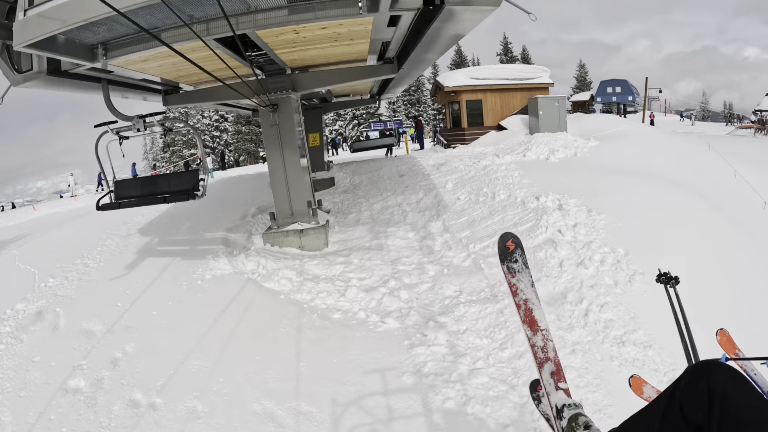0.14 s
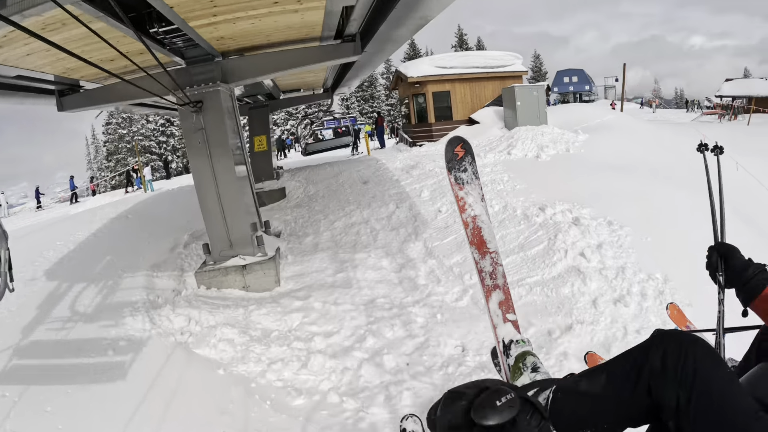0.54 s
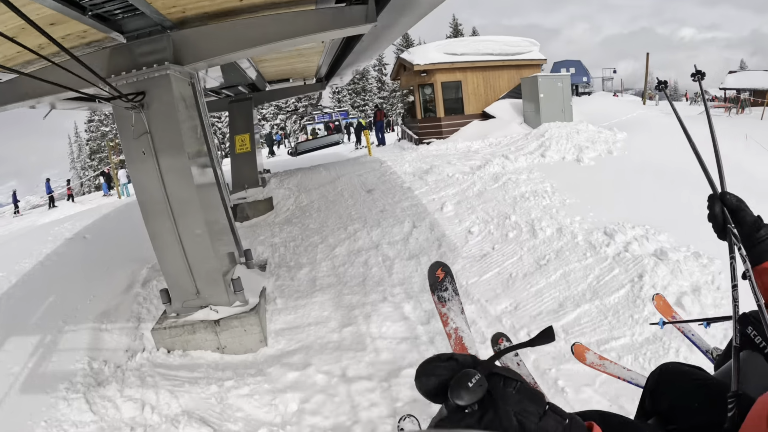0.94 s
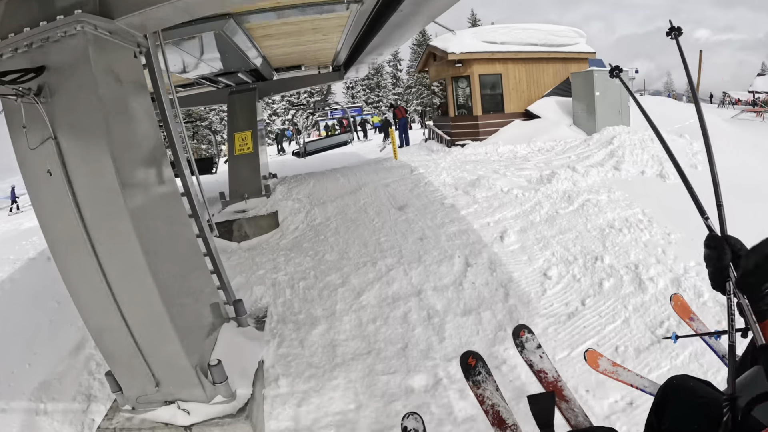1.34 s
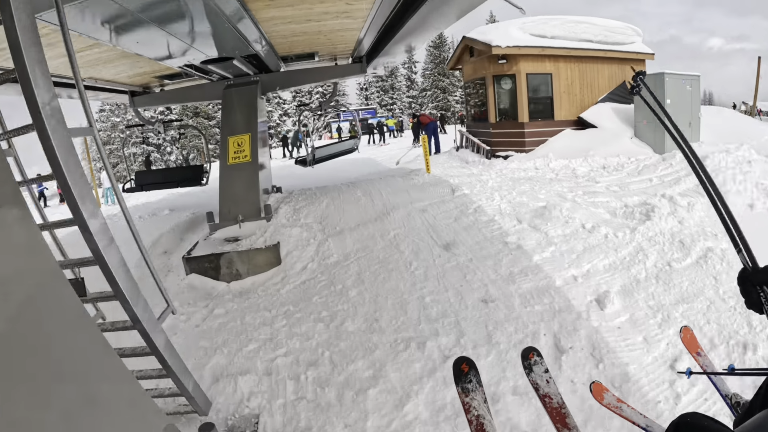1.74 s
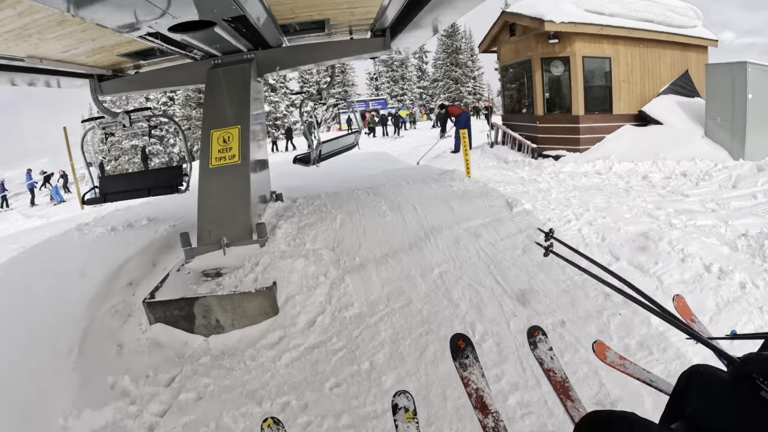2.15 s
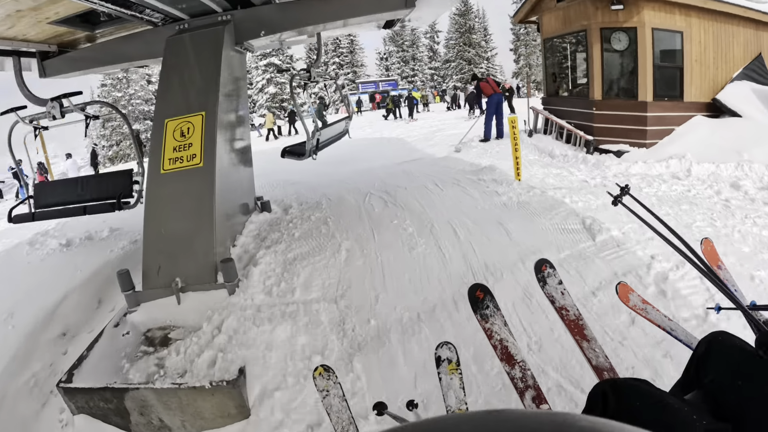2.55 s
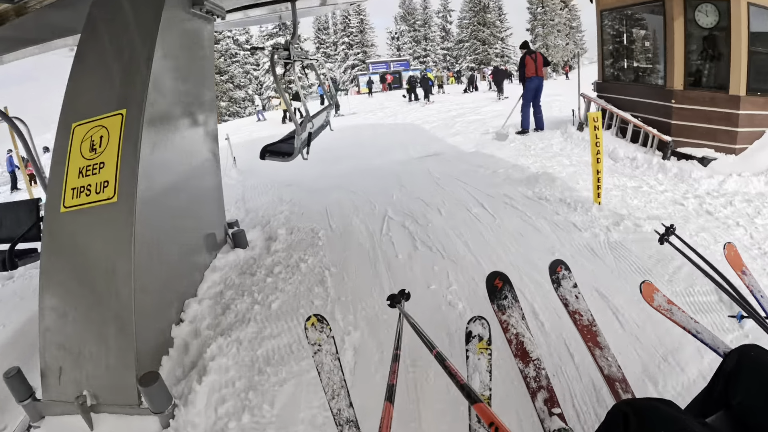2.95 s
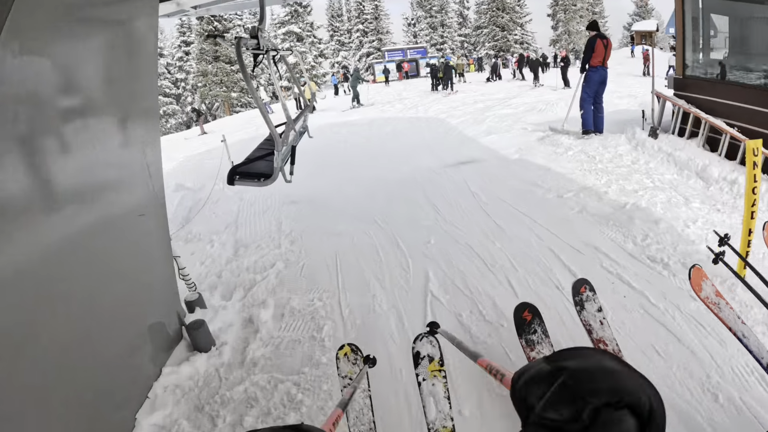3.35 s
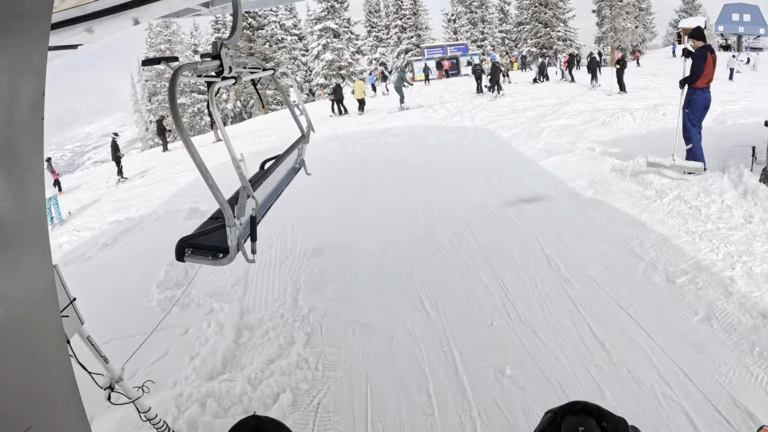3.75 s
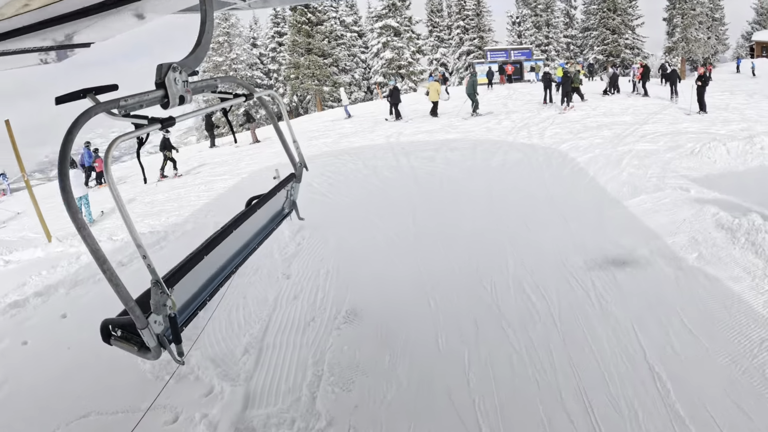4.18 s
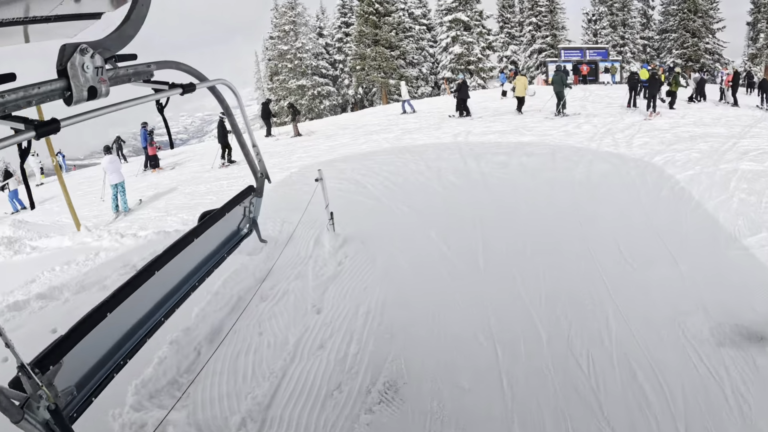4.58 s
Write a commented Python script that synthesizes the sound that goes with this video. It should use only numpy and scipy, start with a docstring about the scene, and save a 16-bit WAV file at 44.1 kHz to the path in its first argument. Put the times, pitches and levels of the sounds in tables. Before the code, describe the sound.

Heard from a chair passing beneath a lift terminal: after a cut and tiny silence, constant rolling roar like rail wheels, a wavering double gear hum and a deep drone. Small steel parts click and chatter with very short rings and a bright roof wash, heavier frame knocks among them. A faint whine flickers mid-ride; later the clanks thin out while the machinery runs to the end, single channel.

```python
"""Chairlift terminal ride

Two gear meshes hum a little over a semitone apart and beat, from wavering sines with a weak octave; the motor
drones low and a conveyor whine comes and goes in the same way. Rollers and tyres roar on the steel rail as
layered noise that also rings the steelwork; the grip and loose steel parts clank overhead as chatters of touches
through ringing modes, with a roof wash, heavier knocks and a thin hiss.
The sound breaks off after a moment in the open, then fades in under the terminal."""
import sys
import numpy as np
from scipy import signal
from scipy.io import wavfile

SR = 44100
rng = np.random.default_rng(int(sys.argv[2]) if len(sys.argv) > 2 else 0)


def persist_wave(psi):
    """Save psi, clipped to +-1, as 16-bit WAV."""
    counts = np.round(np.clip(psi, -1, 1) * 32767).astype(np.int16)
    wavfile.write(sys.argv[1], SR, np.atleast_2d(counts).T)


N = 208001

# the two gear meshes, swelling and sinking independently: (t/s, f/Hz, level/dB)
LOW_GEAR_MESH = [(0.3, 353.7, -28.5), (0.37, 359, -35), (0.44, 358, -27.5), (0.51, 357.6, -21.5),
                 (0.58, 361.2, -24), (0.65, 358, -37), (0.72, 358.5, -19), (0.79, 360.9, -18.5),
                 (0.86, 355.8, -28.5), (0.93, 355.8, -32.5), (1.0, 356.5, -35), (1.07, 357.7, -15.5),
                 (1.14, 358.1, -14.5), (1.21, 357.8, -26.5), (1.28, 357.5, -35), (1.35, 359.4, -45.3),
                 (1.42, 356.4, -20.5), (1.49, 357.1, -20), (1.56, 359.9, -26), (1.63, 360.7, -20.5),
                 (1.7, 357.6, -16.5), (1.77, 359.4, -22.5), (1.84, 359.3, -17.5), (1.91, 357.3, -17),
                 (1.98, 354.5, -26), (2.05, 358, -41), (2.12, 354.9, -36), (2.19, 362.7, -19),
                 (2.26, 353.5, -23), (2.33, 358.6, -43.5), (2.4, 359, -21), (2.47, 358, -17.5),
                 (2.54, 357.3, -28), (2.61, 359, -18), (2.68, 359.8, -31), (2.75, 368.7, -17),
                 (2.82, 360.5, -36), (2.89, 357.7, -17), (2.96, 361, -23.5), (3.03, 361, -20.5),
                 (3.1, 362.7, -17.5), (3.17, 355.3, -19), (3.24, 360.8, -16.5), (3.31, 355, -22.4),
                 (3.38, 355.7, -21), (3.45, 358.4, -12), (3.52, 356.5, -18.5), (3.59, 355.0, -27.5),
                 (3.66, 354.5, -20), (3.73, 359.7, -14.5), (3.8, 362.0, -16.5), (3.87, 360.9, -24),
                 (3.94, 366, -9.5), (4.01, 359.4, -20), (4.08, 356, -28.5), (4.15, 355.3, -19.5),
                 (4.22, 352.5, -18), (4.29, 358.2, -14.5), (4.36, 353, -24.5), (4.43, 356.8, -14),
                 (4.5, 356.3, -22), (4.57, 355.6, -14.5), (4.64, 358.6, -21)]
HIGH_GEAR_MESH = [(0.3, 386.6, -32), (0.37, 384.3, -30.1), (0.44, 384.7, -29), (0.51, 376, -37),
                  (0.58, 382, -27), (0.65, 382, -42), (0.72, 383.2, -26), (0.79, 383.4, -35.5),
                  (0.86, 382.5, -25), (0.93, 383.0, -16.5), (1.0, 384.1, -19), (1.07, 384.2, -30),
                  (1.14, 383.1, -30), (1.21, 377.6, -21), (1.28, 378, -27), (1.35, 380.6, -31),
                  (1.42, 389.3, -24), (1.49, 381.5, -25), (1.56, 383.6, -45.5), (1.63, 381.3, -24.5),
                  (1.7, 380, -16.5), (1.77, 378.2, -20.5), (1.84, 382.5, -25), (1.91, 382.3, -18.5),
                  (1.98, 383.5, -28.5), (2.05, 384.7, -17.5), (2.12, 377.4, -17.5), (2.19, 380, -22),
                  (2.26, 386.8, -19.5), (2.33, 386.5, -20), (2.4, 383.2, -17.5), (2.47, 374.7, -37),
                  (2.54, 385.6, -13.5), (2.61, 387.8, -27.5), (2.68, 384.8, -19.5), (2.75, 388.1, -17.5),
                  (2.82, 385.7, -17), (2.89, 380.8, -17.5), (2.96, 384.3, -22.5), (3.03, 390, -33),
                  (3.1, 384.4, -22.5), (3.17, 384.6, -26), (3.24, 389, -17), (3.31, 383.2, -21),
                  (3.38, 378.2, -32.6), (3.45, 390.2, -21), (3.52, 387, -15.5), (3.59, 386.4, -16.5),
                  (3.66, 386.6, -21.5), (3.73, 383.8, -22), (3.8, 385, -26.5), (3.87, 386.1, -34.4),
                  (3.94, 387.3, -33), (4.01, 383.8, -24), (4.08, 384.2, -17.5), (4.15, 376.4, -31),
                  (4.22, 377.5, -20), (4.29, 384.7, -31.5), (4.36, 381.2, -14.5), (4.43, 386.8, -35),
                  (4.5, 383.2, -16.5), (4.57, 382.7, -13.5), (4.64, 384.8, -19.5)]
# motor drone: (t/s, level/dB)
MOTOR_DRONE = [(0.3, -27.5), (0.5, -55.5), (0.57, -27.5), (1.15, -25), (1.2, -43.5), (1.23, -29.5),
               (1.57, -29), (1.62, -27), (1.76, -23), (1.81, -39.5), (2.05, -15), (2.12, -57.5),
               (2.29, -23), (2.32, -50), (2.41, -22), (2.48, -33.5), (2.59, -25.5), (2.96, -25),
               (3.15, -35.5), (3.19, -26.5), (3.39, -23.5), (3.45, -32), (4.31, -27.5), (4.72, -27)]
# conveyor whine, coming and going: (t/s, level/dB)
CONVEYOR_WHINE = [(2.1, -53), (2.142, -55), (2.168, -59), (2.22, -53), (2.294, -42), (2.384, -32.5),
                  (2.422, -61), (2.496, -37), (2.522, -54), (2.708, -37.5), (2.83, -59), (2.946, -29.5),
                  (3.062, -49), (3.094, -37), (3.142, -57), (3.184, -34), (3.252, -32), (3.374, -48),
                  (3.412, -37), (3.46, -44), (3.476, -65), (3.49, -58), (3.624, -30.5), (4.0, -57.5)]
# low rolling layers: (t/s, rumble level/dB, frame boom level/dB, drumming level/dB, roar level/dB)
ROLLING_LOW = [(0.3, -18.5, -25, -47, -28), (0.37, -17.5, -18.5, -29, -25), (0.42, -20, -26, -29, -26),
               (0.51, -20, -26, -57, -26), (0.89, -21, -28.5, -26, -28), (0.94, -30.5, -28, -24.5, -29),
               (0.98, -22, -26, -19.5, -27.5), (1.14, -23, -29, -55, -30), (1.16, -19.5, -33, -33.5, -29),
               (1.25, -25, -21.5, -20, -23), (1.39, -23, -26.5, -22.5, -23.5),
               (1.58, -27.5, -20.5, -21, -21.5), (1.71, -30, -28, -31, -28), (1.75, -23.5, -26, -29, -25),
               (1.92, -19.5, -19, -36, -22.5), (1.95, -23, -20.5, -46.5, -27), (1.96, -26, -26, -27, -22),
               (2.05, -31.5, -19, -20, -25), (2.08, -20, -19, -28.5, -25), (2.56, -27.5, -27.5, -25.5, -24),
               (3.02, -22.5, -25.5, -31, -24.5), (3.15, -24, -30, -29.5, -26), (3.36, -27.5, -32, -30, -27),
               (3.41, -26.5, -22, -30, -27), (3.52, -29.5, -32, -28, -31), (3.62, -23.5, -25.5, -58, -24.5),
               (3.84, -31, -30.5, -30, -26), (4.03, -21.5, -23, -45, -27.5),
               (4.08, -24.5, -27.5, -31, -24.5), (4.47, -28, -25, -27.5, -27.5),
               (4.57, -22, -28.5, -40, -30), (4.72, -29, -24.5, -30, -26.5)]
# high rolling layers: (t/s, wheel grind level/dB, treble level/dB, top air level/dB)
ROLLING_TOP = [(0.55, -37.5, -46.5, -61), (0.67, -36.5, -45.5, -62), (1.11, -37, -46.5, -64.5),
               (1.38, -30, -45, -60.5), (1.53, -37, -44, -58), (1.58, -31, -40.5, -50),
               (1.73, -38.5, -47.5, -60), (2.0, -37, -48.5, -62), (2.31, -33.5, -48, -61.5),
               (2.83, -36.5, -50, -61.5), (3.02, -30.5, -43.5, -56.5), (3.16, -34, -48, -59),
               (4.33, -32.5, -50, -60), (4.65, -35.5, -53.5, -61.5)]
# the seven rolling layers in the open, lowest first: level/dB
OPEN_AIR_LEVELS = [-38, -33, -39.5, -34.5, -42.5, -45, -55.5]
# borders between the seven rolling layers: f/Hz
LAYER_EDGES = [18, 105, 260, 410, 1100, 2400, 6500, 15000]
# colour of the noise inside each layer: (f/Hz, relative density/dB per Hz)
ROLLING_COLOUR = [(20, 1.5), (70, 1), (130, -10), (250, -17.5), (400, -12), (800, -20), (1050, -26),
                  (2100, -28), (2600, -42), (3000, -43.5), (3800, -45.5), (4600, -49), (5400, -52.5),
                  (6500, -56), (9500, -62.5), (11000, -70), (12500, -79), (14000, -92.5)]
# steel body rung by noise: (f/Hz, width of each of two resonators/Hz, level at the mean roar/dB)
RAIL_RESONANCES = [(206.4, 3.1, -36.5), (298.5, 25, -35.5), (333.9, 14, -31), (448, 110, -39.5),
                   (531.6, 99, -36.5), (632, 75, -43), (781, 43, -40), (1530, 30, -50.5),
                   (4730, 420, -62.5)]
# clanks: (t/s, blow level/dB, first ring f/Hz, second ring f/Hz, second over first/dB, chatter length/s)
CLANK_BLOWS = [(0.452, -34, 3920, 7060, -0.5, 0.005), (0.489, -54, 4300, 6400, 2, 0.037),
               (0.643, -37.5, 3800, 6150, -4.5, 0.009), (0.646, -53, 9000, 7100, -3, .009),
               (0.688, -32.5, 4836, 8210, -8, 0.0071), (0.689, -48, 9700, 11500, -1, 0.0081),
               (0.772, -55, 6404, 7150, 6, 0.014), (0.823, -38.5, 4230, 6830, 3, 0.011),
               (0.824, -55, 9000, 11000, -1, .012), (0.835, -46, 4900, 4100, 3, 0.019),
               (0.851, -42, 4360, 6860, -2, 0.012), (0.855, -48, 8700, 10000, -3, .015),
               (0.868, -47, 4220, 4865, -7, 0.014), (0.923, -40, 4172, 7000, 5, 0.0066),
               (0.924, -48, 9300, 11200, 0, .012), (0.937, -43, 4022, 8000, -21, 0.037),
               (0.995, -48.5, 3442, 4650, -9, 0.02), (1.105, -52.5, 3120, 5220, 12, 0.0077),
               (1.1742, -45, 3110, 5207, -7, 0.017), (1.284, -50, 2870, 4930, -20, 0.01),
               (1.342, -43.5, 3477, 5244, -5, 0.037), (1.375, -33.5, 5240, 6300, -13, 0.021),
               (1.405, -43.5, 3330, 4600, -3, 0.033), (1.39, -45, 4560, 8300, -2, 0.023),
               (1.495, -36.5, 3324, 5137, 1, 0.0089), (1.575, -39, 2370, 5014, -11, 0.011),
               (1.592, -42.5, 2546, 4550, 8, 0.015), (1.626, -41.5, 3376, 5200, -2, 0.019),
               (1.665, -43.5, 3330, 4960, 8, 0.017), (1.796, -50, 3272, 5100, 1, 0.011),
               (1.841, -41, 4863, 5280, -11, 0.013), (1.859, -49, 4780, 5300, -4, .018),
               (2.179, -46, 3220, 4697, -11, 0.01), (2.913, -46, 2884, 5414, 4, 0.014),
               (2.957, -48, 3360, 5226, 16, 0.011), (2.965, -51, 5993, 10000, -10, 0.0052),
               (3.018, -30.5, 2949, 5190, -3.5, 0.014), (3.023, -34.5, 3200, 4440, -6, 0.012),
               (3.02, -52, 7450, 9000, -2, .008), (3.01, -41, 8100, 3397, 3, 0.0073),
               (3.031, -39, 8100, 8936, -7, 0.019), (3.058, -42, 8100, 4500, -16, 0.012),
               (3.11, -44, 8117, 4540, -7, .008), (3.096, -44.5, 3314, 5500, 0, 0.015),
               (3.4025, -43, 3410, 5000, -5, 0.021), (3.625, -48, 4660, 6750, -3, 0.021),
               (3.697, -49, 4650, 6674, -7, 0.0095), (4.511, -55, 3344, 6717, -16, 0.0097)]
# modes of the struck steel, before detuning and scatter: (f/Hz, relative level/dB, t60/s)
STEEL_MODES = [(2300, -2, 0.063), (2600, -22, 0.068), (3300, -20, 0.021), (3310, -15.5, 0.041),
               (3186, 6, 0.038), (3800, -6.5, 0.016), (4240, 3, 0.016), (4420, 9.5, 0.045),
               (4570, -6.5, 0.031), (4980, 2.5, 0.039), (6100, -18, 0.022), (6340, -17.5, 0.013),
               (7850, -6.5, 0.024), (8080, -16.5, 0.14), (7450, -17, 0.02), (8650, -30.5, .025),
               (10200, -12.5, .025), (11500, -15, 0.027), (12700, -23, .025)]
# knocks of the heavier frame: (t/s, level/dB, f/Hz, length/s, held to 0.003-0.09 s when played)
FRAME_KNOCKS = [(0.451, -39, 1500, 0.0072), (0.695, -28, 1680, 0.012), (1.174, -32, 1700, 0.023),
                (1.255, -24.5, 524.5, 0.16), (1.293, -32, 1400, 0.026), (1.385, -31, 2070, 0.034),
                (1.595, -31, 2200, 0.029), (2.18, -34, 1700, .015), (2.34, -33.5, 1700, 0.032),
                (2.917, -31, 1800, 0.014), (3.018, -24.5, 1710, 0.017), (3.402, -26, 1450, 0.016),
                (4.505, -27, 1491, .01)]
# thin high hiss, swelling twice late in the ride: (t/s, level/dB)
THIN_HISS = [(3.2, -101), (3.5, -91), (3.78, -67.5), (3.9, -65), (3.96, -70), (4.14, -68), (4.21, -65),
             (4.33, -86), (4.56, -92), (4.7, -79)]

CUT_S, FADE_START_S, FADE_END_S, FADE_BEND = .0875, 0.22, 0.29, 1.85
CUTOFF_HZ = 15800
GEAR_FLUTTER_DB, GEAR_WOBBLE_HZ = 1.2, 1.5
MOTOR_HZ, WHINE_HZ = 101.2, 1163   # centre pitches
BUMP_DB, BUMP_RATE_HZ = 1.2, 18
ATTACK_S = 0.0032   # onset of clanks and knocks
PART_T60_S = .008   # ring of the loose part
DETUNE = .03   # spread of each blow's shift of the shorter steel modes, as a share of pitch
ROOF_T60_S, ROOF_DB, ROOF_LOW_HZ = .07, -6.5, 2680


def amp(db):
    """Decibels to gain."""
    return 10 ** (np.asarray(db) / 20)


def rms_one(x):
    """Scale to rms 1."""
    return x / np.sqrt(np.mean(x ** 2) + 1e-20)


def in_time(rows):
    """Draw table columns as automation curves, one value a sample."""
    s, *columns = np.transpose(rows)
    return [np.interp(np.arange(N) / SR, s, c) for c in columns]


def drift(rate_hz):
    """Slow random modulation of rms 1: low-passed noise made at every 40th sample."""
    pole = np.exp(-80 * np.pi * rate_hz / SR)
    noise = rng.standard_normal(N // 40 + 2002)
    slow = signal.lfilter([1], [1, -2 * pole, pole * pole], noise)[2000:]   # drop the run-in
    return np.interp(np.arange(N) / 40, np.arange(len(slow)), rms_one(slow))


def band(x, low_hz, high_hz):
    """Butterworth band-pass."""
    return signal.sosfilt(signal.butter(2, [low_hz, high_hz], "band", fs=SR, output="sos"), x)


def ring(x, hz, t60):
    """Two-pole resonator: a unit click starts a decaying sine of height 1."""
    pole, w = amp(-60 / (t60 * SR)), 2 * np.pi * hz / SR
    return signal.lfilter([0, np.sin(w)], [1, -2 * pole * np.cos(w), pole * pole], x + 1e-18)


def tone(hz, level_db, wobble_hz, flutter_db, octave_db):
    """A machine tone: a sine and its weak octave, shivering a little in pitch and level."""
    wavering_hz = hz + wobble_hz * drift(8.92)
    phase = 2 * np.pi * np.cumsum(wavering_hz) / SR + 2 * np.pi * rng.random()
    wave = np.sin(phase) + amp(octave_db) * np.sin(2 * phase)
    return np.sqrt(2) * amp(level_db + flutter_db * drift(11.0)) * wave


def gears():
    """Two tooth meshes close in pitch, so their hums beat."""
    low = tone(*in_time(LOW_GEAR_MESH), GEAR_WOBBLE_HZ, GEAR_FLUTTER_DB, -21)
    high = tone(*in_time(HIGH_GEAR_MESH), GEAR_WOBBLE_HZ, GEAR_FLUTTER_DB, -22.5)
    return low + high


def motor():
    """Low motor drone that shivers around one pitch."""
    return tone(MOTOR_HZ, *in_time(MOTOR_DRONE), 4.16, 1.58, -27.5)


def whine():
    """Wavering whine, heard only beside the conveyor."""
    t = np.arange(N) / SR
    near = (t > CONVEYOR_WHINE[0][0]) & (t < CONVEYOR_WHINE[-1][0])
    return near * tone(WHINE_HZ, *in_time(CONVEYOR_WHINE), 2.9, 2.5, -29.5)


def rolling(patchy_db=1.46):
    """Narrow noise bands flicker apart within seven layers; bumps on the rail shake all layers together."""
    white = rng.standard_normal((2, N + SR // 2))   # half a second of filter run-in
    bumps, out = drift(BUMP_RATE_HZ), np.zeros(N)
    colour_hz, colour_level = np.transpose(ROLLING_COLOUR)
    in_open = np.arange(N) < CUT_S * SR
    levels_db = in_time(ROLLING_LOW) + in_time(ROLLING_TOP)
    for low, high, level_db, open_db in zip(LAYER_EDGES, LAYER_EDGES[1:], levels_db, OPEN_AIR_LEVELS):
        edges = np.geomspace(low, high, round(4 * np.log2(high / low)) + 1)   # quarter octaves or so
        layer = np.zeros(N)
        for k, (a, b) in enumerate(zip(edges, edges[1:])):
            colour_db = np.interp(np.log(a * b) / 2, np.log(colour_hz), colour_level)
            noise = band(band(white[k % 2], a, b), a, b)[-N:]   # neighbours use different noise
            layer += amp(colour_db + patchy_db * drift(5.4)) * noise
        out += amp(np.where(in_open, open_db, level_db) + BUMP_DB * bumps) * rms_one(layer)
    return out


def rail():
    """Noise-driven resonances of the steelwork, swelling with the roar, silent in the open."""
    roar_db = in_time(ROLLING_LOW)[-1]
    out = np.zeros(N)
    for hz, width_hz, level_db in RAIL_RESONANCES:
        t60 = np.log(1000) / (np.pi * width_hz)
        ringing = ring(ring(rng.standard_normal(N), hz, t60), hz, t60)
        out += amp(level_db) * rms_one(ringing)
    return out * amp(roar_db - roar_db.mean()) * (np.arange(N) > CUT_S * SR)


def clanks(spread_octaves=0.089, scatter_db=6.5, modes_db=-19.5, far_db=-20.5, touches_per_s=9000.0,
           crack_db=-6.0, part_db=-7.0):
    """Each blow is a chatter of touches; the loose part rings at its two pitches, the steel mostly near them."""
    t = np.arange(int(.2 * SR)) / SR
    blows, rings = np.zeros(N + SR), np.zeros(N + SR)
    luck = rng.standard_normal((len(CLANK_BLOWS), 2, len(STEEL_MODES)))
    size = (len(CLANK_BLOWS), len(t))
    touches = rng.standard_normal(size) * (rng.random(size) < touches_per_s / SR)
    mode_hz, mode_db, t60s = np.transpose(STEEL_MODES)
    all_t60s = np.r_[t60s, PART_T60_S, PART_T60_S]
    for row, chatter, (scatter, shift) in zip(CLANK_BLOWS, touches, luck):
        s, blow_db, low_hz, high_hz, high_db, length_s = row
        at = round(s * SR)

        shape = (1 - np.exp(-t / ATTACK_S)) * np.exp(-(t / np.clip(length_s, .002, .06)) ** 2)
        force = chatter * shape
        # even out the luck of the touches, so each blow keeps its level
        force *= amp(blow_db) * np.sqrt(touches_per_s / SR * np.sum(shape ** 2) / np.sum(force ** 2))
        blows[at:at + len(t)] += force

        near_low, near_high = [np.exp(-(np.log2(mode_hz / hz) / spread_octaves) ** 2)
                               for hz in (low_hz, high_hz)]
        share = near_low + amp(high_db) * near_high + amp(far_db + mode_db)
        share *= amp(modes_db + scatter_db * scatter)
        bright = np.diff(force, 2, prepend=[0, 0])   # a short contact feeds the high modes
        detuned_hz = mode_hz * (1 + DETUNE * shift * (t60s < .05))
        pitches = np.r_[detuned_hz, low_hz, high_hz]
        gains = np.r_[share, amp(part_db), amp(part_db + high_db)]
        gains /= (2 * np.sin(np.pi * pitches / SR)) ** 2   # offset the brightening at each pitch
        for hz, gain, t60 in zip(pitches, gains, all_t60s):
            rings[at:at + len(t)] += gain * ring(bright, hz, t60)
    crack = amp(crack_db) * band(band(blows, 2400, 4700), 3000, 4700)   # the dry tick of each touch
    return (crack + band(band(rings, 1400, 6900), 1200, 17000))[:N]


def knocks(width_octaves=0.5):
    """Each frame knock is a short burst of noise in a broad band around its pitch."""
    t, out = np.arange(int(.2 * SR)) / SR, np.zeros(N + SR)
    pushes = rng.standard_normal((len(FRAME_KNOCKS), len(t)))
    for (s, level_db, hz, length_s), push in zip(FRAME_KNOCKS, pushes):
        at = round(s * SR)
        shape = (1 - np.exp(-t / ATTACK_S)) * np.exp(-(t / np.clip(length_s, .003, .09)) ** 2)
        body = rms_one(band(push, hz * 2 ** -width_octaves, hz * 2 ** width_octaves))
        out[at:at + len(t)] += amp(level_db) * shape * body
    return out[:N]


def roof(x):
    """The steel roof smears each clank into a short bright wash of decaying noise."""
    t = np.arange(SR // 4) / SR
    tail = band(rng.standard_normal(len(t)), ROOF_LOW_HZ, 12000) * amp(-60 * t / ROOF_T60_S)
    return amp(ROOF_DB) * signal.fftconvolve(x, tail / np.sqrt(np.sum(tail ** 2)))[:N]


def hiss(low_hz=11600, high_hz=13700):
    """Thin high hiss: band-passed noise that swells twice late in the ride."""
    return amp(*in_time(THIN_HISS)) * rms_one(band(rng.standard_normal(N), low_hz, high_hz))


def scene():
    """Mix all sources to one channel; the drive is heard only under the terminal."""
    under_terminal = np.arange(N) > CUT_S * SR
    drive = under_terminal * (gears() + motor() + whine())
    steel = clanks()
    return (drive + rolling() + rail() + steel + knocks() + roof(steel) + hiss())[None]


def record(dry):
    """Hard cut, silence and fade-in; subsonics filtered off, peaks rounded, top cut."""
    t = np.arange(N) / SR
    fade = np.clip((t - FADE_START_S) / (FADE_END_S - FADE_START_S), 0, 1) ** FADE_BEND
    low_cut = signal.cheby1(8, 1, 20, "high", fs=SR, output="sos")
    running = np.concatenate([dry[:, SR // 2:0:-1], dry], axis=1)   # mirrored lead-in settles the filter
    x = signal.sosfilt(low_cut, running)[:, -N:] * np.where(t < CUT_S, 1, fade)
    x = .68 * np.tanh(x / .68)
    return signal.sosfilt(signal.cheby2(12, 70, CUTOFF_HZ, fs=SR, output="sos"), x)


dry = scene()
out = record(dry)
persist_wave(out)
```